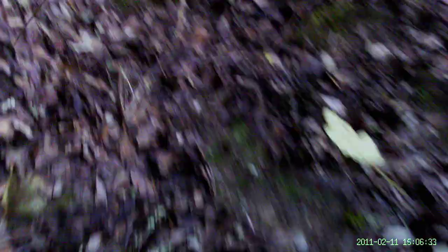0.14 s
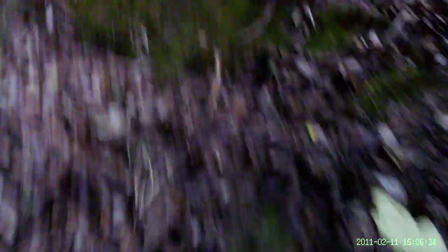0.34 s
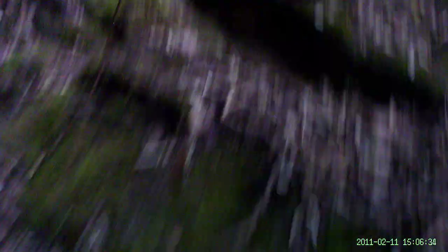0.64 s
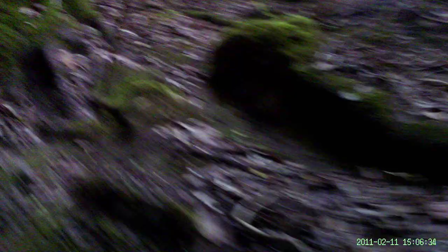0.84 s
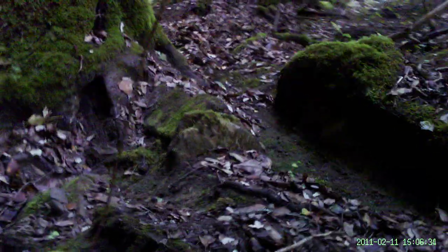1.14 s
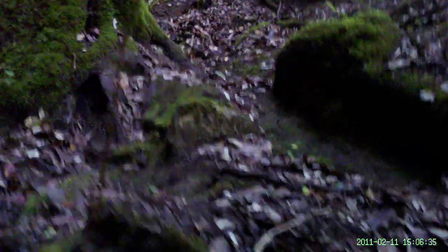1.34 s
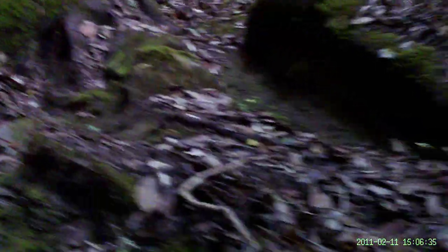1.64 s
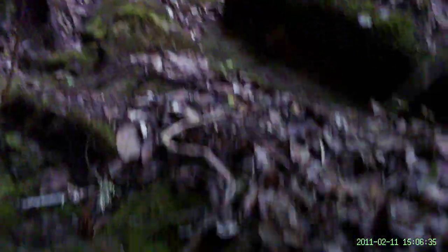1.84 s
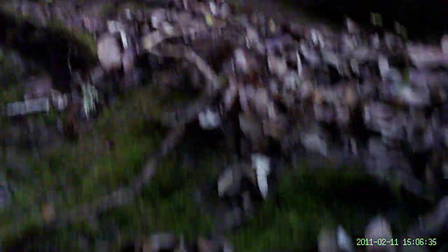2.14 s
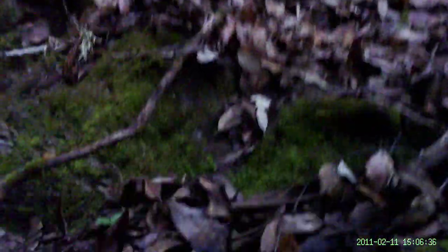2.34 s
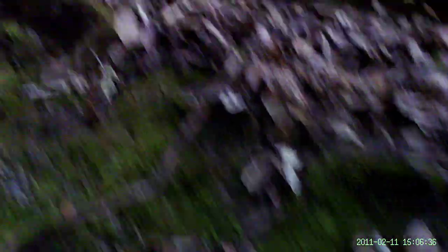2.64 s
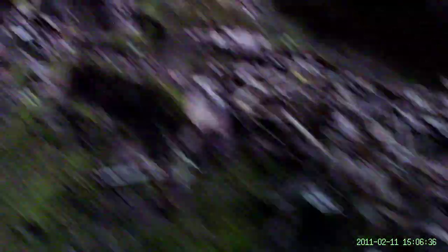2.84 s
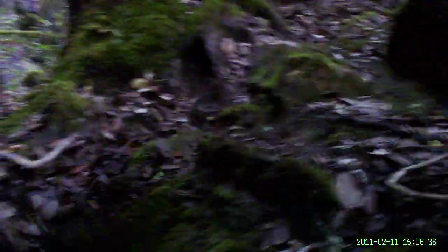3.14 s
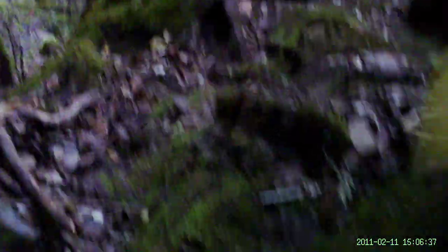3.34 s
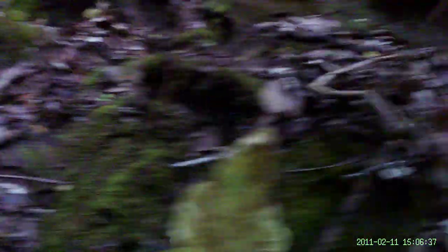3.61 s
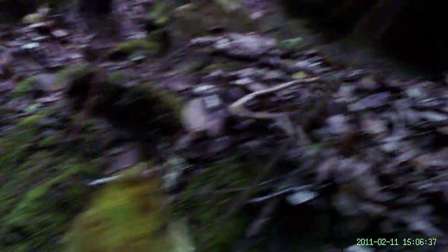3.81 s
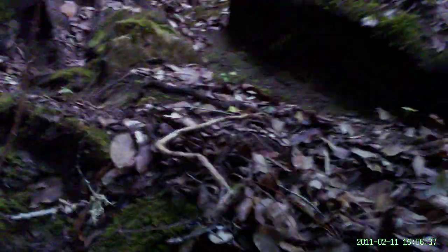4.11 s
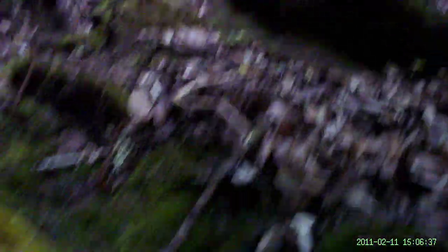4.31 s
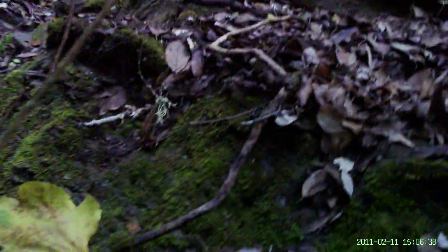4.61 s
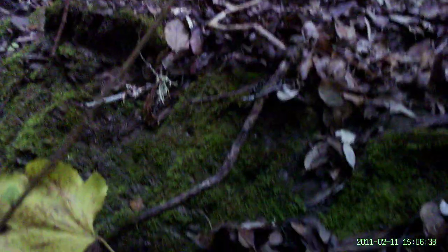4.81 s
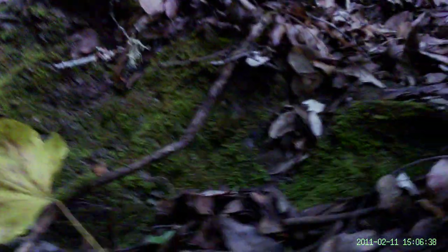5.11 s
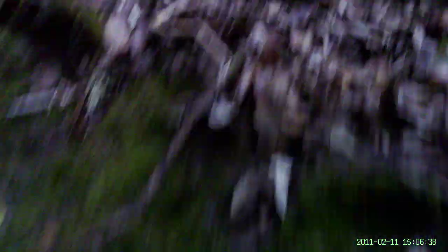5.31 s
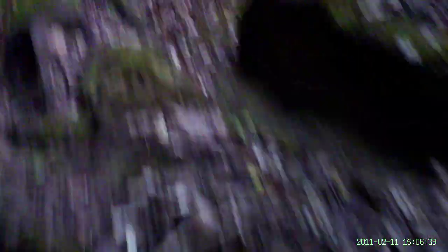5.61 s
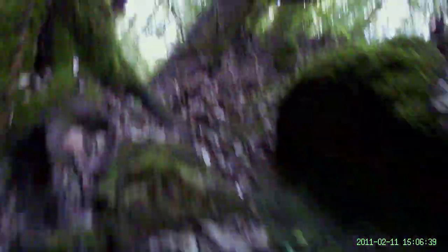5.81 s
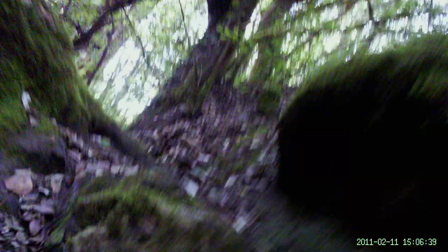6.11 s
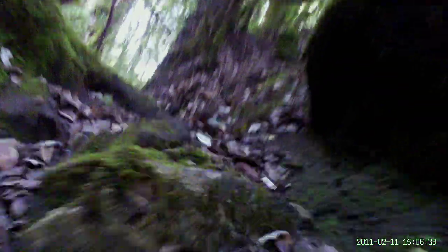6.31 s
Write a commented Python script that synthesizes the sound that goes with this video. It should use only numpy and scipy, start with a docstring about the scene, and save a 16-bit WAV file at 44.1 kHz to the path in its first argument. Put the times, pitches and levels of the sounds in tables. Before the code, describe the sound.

Uneven tinkling of a little metal bell amid crisp leaf litter crackling and twigs snapping, with quiet microphone hiss and a low electrical hum.

```python
"""A small bell jingles irregularly over rustling dry leaves, as someone moves on a forest floor.
Where the clapper lands on the shell decides which modes ring, so each strike has its own colour.
Leaves are clumped fractures that rustle and crunch; sharp bursts snap, and short tones make soft plips.
A lower bell, a bank of dying modes, clinks once. Below lie filtered hiss, an uneven rumble and a low
electronic buzz of steady sines; a peaky microphone colours the clapper and the crisp leaves."""
import sys
import numpy as np
from scipy import signal
from scipy.fft import rfft, irfft
from scipy.io import wavfile

SR = 44100
rng = np.random.default_rng(int(sys.argv[2]) if len(sys.argv) > 2 else 0)


def transcribe(signal):
    """Save signal, clipped to [-1, 1], as a 16-bit WAV file at the path in sys.argv[1]."""
    frames = np.atleast_2d(signal).T
    limited = np.clip(frames, -1, 1)
    pcm = np.round(limited * 32767).astype(np.int16)
    wavfile.write(sys.argv[1], SR, pcm)


N = 284886
TIME = np.arange(N) / SR


def amp(db):
    """Decibels to gain."""
    return 10 ** (np.asarray(db) / 20)


def unit(x):
    """Scales to rms 1."""
    return x / np.sqrt(np.mean(x ** 2) + 1e-20)


def add(mix, start_s, sound):
    """Mixes a sound in at start_s, cutting it at the end of the mix."""
    part = mix[max(round(start_s * SR), 0):][:len(sound)]
    part += sound[:len(part)]


def response(*spectra, size=2048):
    """Causal (minimum-phase) impulse response of energy 1 with the given spectra in series."""
    hz = abs(np.fft.fftfreq(size, 1 / SR))
    db = np.zeros(size)
    for spectrum in spectra:
        point_hz, point_db = np.transpose(spectrum)
        db += np.interp(np.log(hz + 1), np.log(point_hz), point_db)
    log_spectrum = signal.hilbert(np.log(amp(db))).conj()
    taps = np.fft.ifft(np.exp(log_spectrum)).real[:size // 2]
    return taps / np.linalg.norm(taps)


def through(x, taps):
    """Filters by an impulse response."""
    return signal.oaconvolve(x, taps)[:N]


def drift(hz):
    """Smooth chance of rms 1 that changes about hz times a second."""
    lowpass = 1 / (1 + (np.fft.rfftfreq(N, 1 / SR) / hz) ** 4)
    return unit(irfft(rfft(rng.standard_normal(N)) * lowpass, N))


def crackle(per_s, spread_db):
    """Tiny fractures at random moments: many small, a few large; rms 1."""
    sizes = amp(spread_db * np.minimum(rng.exponential(1, N), 4))
    signs = rng.choice([-1, 1], N)
    return unit(sizes * signs * (rng.random(N) < per_s / SR))


# each mode's weak twin: amplitude against the mode, widest split either way [Hz], factor on t60
TWIN, TWIN_SPLIT_HZ, TWIN_LASTS = 0.15, 19.5, 1.7
# the clapper settles on the shell, so a ring dies ever faster:
# its decay is nominal at SETTLE_S and steepens as this power of time
SETTLE_S, SETTLE_POWER = 0.068, 0.16


def ring(modes, t, onset_db=0.5, onset_s=0.0029, rise_s=0.0003, scatter=1.06):
    """Dying modes of a shell not quite round: each has a twin that starts in step, beats and outlasts it."""
    out = np.zeros(len(t))
    settled = t * (t / SETTLE_S) ** SETTLE_POWER
    for hz, db, t60 in modes:
        phase, offset, damping = rng.uniform(-1, 1, 3)
        lasts = max(t60, .01) * scatter ** damping  # the resting clapper damps each mode a little differently
        twin_hz = hz + TWIN_SPLIT_HZ * offset
        twin_level = TWIN * amp(db - 60 * t / (lasts * TWIN_LASTS))
        out += amp(db - 60 * settled / lasts) * np.sin(2 * np.pi * hz * t + np.pi * phase)
        out += twin_level * np.sin(2 * np.pi * twin_hz * t + np.pi * phase)
    onset = amp(onset_db * np.exp(-t / onset_s)) * (1 - np.exp(-t / rise_s))
    return np.sqrt(2) * out / (1 + TWIN / 2) * onset


# how each bell mode above the lowest lies on the shell: (antinode level before strike force [dB],
# lobes along the rim [count], lobes up the wall [count], offset of its first still line [lobes])
MODE_SHAPES = [(-22, 0.25, 0.59, 0.507), (-22, 0.89, -1.36, 0.097), (-18, 1.73, -0.8, 0.098),
               (-29.5, 1.26, -2.5, 0.13), (-23.5, 0.48, -1.08, 0.063), (-31.5, 2, 0.13, 0.8),
               (-31, 1.84, -0.55, 0.67), (-35, 0.73, 1.5, 0.7)]
NODE_LEAK = 0.0071  # power a mode still gets on a still line, before normal motion is added


def struck(force_db, along, up):
    """Level in dB of each upper mode for one strike: strong on its antinodes, weak on its still lines."""
    db, rim_lobes, wall_lobes, offset = np.transpose(MODE_SHAPES)
    motion = np.sin(np.pi * (rim_lobes * along + wall_lobes * up + offset))
    return db + force_db + 10 * np.log10(NODE_LEAK + motion ** 2)


# the bell's modes: (frequency [Hz], nominal t60 [s])
BELL_MODES = [(1741, .22), (3808, .4), (4203, .32), (5473, .2), (6194, .24), (7278, .22), (8330, .18),
              (9195, .15), (10163, .18)]
# faint top modes: (frequency [Hz], level over the three highest main modes [dB], nominal t60 [s])
BELL_TOP_MODES = [(10000, -12, .2), (10560, -7.5, .11), (11560, -14, 0.12), (11500, -20, 0.14),
                  (13655, -22, .13)]
# clapper strikes: (time [s], force [dB], place along the rim [0-1], place up the wall [0-1],
# ring length [factor on t60], nominal level of the lowest mode [dB])
BELL_STRIKES = [(0.0, -20, 0.61, 0.1, 1.7, -59), (0.0855, -17.5, 0.01, 0.17, 0.97, -44.0),
                (0.311, -6.5, 0.8, 0.39, 1.38, -32.5), (0.462, -16, 0.43, 0.93, 1.66, -39.5),
                (0.7, -18, 0.01, 0.12, 0.97, -45), (1.154, -26.5, 0.9, 0.77, 1.1, -44.5),
                (1.4377, -13.5, 0.19, 0.95, 0.78, -44), (1.8169, -2.5, 0.77, 0.43, 1.58, -37.0),
                (1.931, -16, 0.87, 0.4, 1.2, -42.5), (2.477, -19.8, 0.91, 0.77, 0.92, -36.5),
                (2.568, -4, 0.82, 0.54, 0.92, -41), (2.813, -18.5, 0.37, 0.33, 1.25, -50.5),
                (2.9886, -11.5, 0.58, 0.25, 0.99, -42.5), (3.209, -17, 0.99, 0.14, 0.8, -56.5),
                (3.3206, -5, 0.68, 0.5, 0.82, -36), (3.689, -11, 0, 0.66, 0.87, -36.0),
                (3.7793, -12.2, 0.8, 0.52, 1.34, -61), (3.897, -8.5, 0.45, 0.77, 0.81, -37),
                (3.999, -21, 1, 0.01, 1.05, -43), (4.2204, -23, 0.1, 0, 0.78, -42),
                (4.327, 0.0, 0.61, 0.39, 0.67, -43.5), (4.3694, -16, 0.09, 0, 0.99, -43.5),
                (5.0951, -14, 0.3, 0.38, 0.79, -35), (5.6164, -20, 0.09, 0.13, 0.94, -44.5),
                (5.8036, -22, 0, 0.3, 0.46, -36.5), (5.9723, -5.5, 0.21, 0.95, 0.78, -45),
                (6.1614, -16.5, 0.76, 0.84, 1.1, -43.5), (6.294, -5.5, 0.3, 0.89, 0.41, -45.5)]
# brief clank just under the lowest mode: (frequency [Hz], level over that mode [dB], nominal t60 [s])
SHELL_CLANK = (1637, -6, 0.028)
# clapper contact: (frequency [Hz], relative level [dB per Hz])
CLAPPER_SPECTRUM = [(500, -41), (2800, -21), (3900, -4), (6000, -1), (9000, -2), (12000, -1.5),
                    (16000, -20)]
# the microphone's peaky colour: (frequency [Hz], gain [dB])
MIC_COLOUR = [(100, 4.5), (2600, 0), (3400, 2), (4100, 8.5), (4750, 15.5), (5300, 8), (6000, 0.5),
              (7500, -1.5), (16000, -0.5)]
# whatever presses on the shell shortens the ring and pulls it flat, steeply so when it presses hard
FREE_CENTS, PRESSED_CENTS, PRESS_POWER = 5.75, 5.45, 2.65
LOW_MODE_FOLLOWS = 0.24  # power of the ring length felt by the lowest mode; the others feel it fully


def bell(tick_db=-4.5, tick_t60=0.013, chatter_db=-19, chatter_t60=0.36, sag_s=0.112, stop_s=0.017):
    """Each strike rings the modes with a tick and some chatter; the clapper's next touch stops the old ring."""
    rings, contact = np.zeros(N), np.zeros(N)
    next_times = [row[0] for row in BELL_STRIKES[1:]] + [N / SR]
    for (s, force_db, along, up, length, low_db), next_s in zip(BELL_STRIKES, next_times):
        t = np.arange(0, min(next_s - s + .03, .5), 1 / SR)
        levels = [low_db, *struck(force_db, along, up)]
        modes = [(hz, db, t60 * length) for (hz, t60), db in zip(BELL_MODES, levels)]
        low_hz, low_t60 = BELL_MODES[0]
        modes[0] = (low_hz, low_db, low_t60 * length ** LOW_MODE_FOLLOWS)
        treble_db = 10 * np.log10(np.mean(amp(levels[-3:]) ** 2))
        for hz, db, t60 in BELL_TOP_MODES:
            modes.append((hz, treble_db + db + rng.uniform(-4, 4), t60 * length))
        clank_hz, clank_db, clank_t60 = SHELL_CLANK
        modes.append((clank_hz, low_db + clank_db, clank_t60))
        # the detuning grows as the ring dies
        cents = FREE_CENTS - PRESSED_CENTS / length ** PRESS_POWER
        pitch = 2 ** (cents * (.5 + t / sag_s) / 1200)
        stopped = np.exp(-np.maximum(s + t - next_s, 0) / stop_s)
        add(rings, s, ring(modes, t * pitch) * stopped)
        force = np.linalg.norm(amp(levels))
        tick = amp(tick_db - 60 * t / tick_t60)
        chatter = amp(chatter_db - 60 * t / chatter_t60)
        add(contact, s, force * (tick + chatter))
    grains = contact * crackle(14000, spread_db=5.0)
    return rings + through(grains, response(CLAPPER_SPECTRUM, MIC_COLOUR))


def chips(low_hz, high_hz, per_s, cycles, spread_db, size=500):
    """Fractures in scraps of many sizes: each rings for a few cycles at its own pitch; rms 1."""
    when, height, chance, sign = rng.random((int(per_s * N / SR), 4)).T[:, :, None]
    turns = low_hz * (high_hz / low_hz) ** height * np.arange(size) / SR
    scraps = np.sin(2 * np.pi * turns) * turns * np.exp(-turns / cycles) * np.linspace(1, 0, size)
    scraps /= np.linalg.norm(scraps, axis=1, keepdims=True)
    # many small, a few large
    scraps *= np.sign(sign - .5) * amp(spread_db * np.minimum(-np.log(chance), 4))
    places = (when * N).astype(int) + np.arange(size)
    return unit(np.bincount(places.ravel(), scraps.ravel(), N)[:N])


# steady rustle: (time [s], crisp top level before trim [dB], hollow litter level before trim [dB])
RUSTLE = [(0.0, -52.5, -60.5), (0.34, -46.5, -57), (0.61, -48.5, -59.5), (0.81, -46.5, -58.5),
          (1.44, -48.5, -61), (1.6, -50, -63), (2.12, -50, -59), (2.81, -54, -62.5), (3.18, -53.5, -62),
          (3.42, -54, -63), (3.65, -52.5, -60), (4.23, -49.5, -62), (4.84, -51.5, -61), (4.98, -53.5, -61),
          (5.14, -51.5, -63.5), (6.01, -48, -57.5), (6.13, -46.5, -56.5), (6.46, -43.5, -54)]
# slow sweeps through the leaves, and short crunches under a foot:
# (middle time [s], half width [s], level [dB], hollow body over that level before trim [dB])
FOOT_CRUNCHES = [(.215, 0.027, -37.5, -6), (.69, 0.077, -42, -19), (.829, 0.016, -35.5, -2),
                 (1.257, 0.0099, -38, -7), (1.35, .021, -27, -7), (1.512, 0.0057, -38.5, -10),
                 (2.205, 0.011, -42.5, 0), (3.04, 0.057, -41.5, -8), (3.149, 0.0073, -36, -24),
                 (3.365, 0.0061, -32.5, -11), (3.679, 0.02, -50, 11.5), (4.527, 0.0062, -41, -9),
                 (4.629, .0055, -37.5, -19), (4.951, 0.0064, -39, 9), (4.993, 0.0041, -39.5, 9.5),
                 (5.036, 0.009, -35, 4.5), (5.48, 0.064, -39.5, -35), (5.713, 0.016, -32.5, -10.5),
                 (6.22, 0.018, -37, -2), (6.405, 0.0027, -33.5, -7)]
# dry leaves: (frequency [Hz], relative level [dB per Hz])
LEAF_SPECTRUM = [(300, -14), (1000, -18.5), (2500, -5.5), (4000, -1.5), (6000, -1), (8000, -4.5),
                 (9800, -6.5), (11500, -13.5), (14000, -15), (16000, -24)]
# hollow body of the litter: (frequency [Hz], relative level [dB per Hz])
BODY_SPECTRUM = [(200, -3.5), (550, -6), (850, -2), (1300, -4), (2000, -6), (3200, -3.5), (5000, 3),
                 (12000, -76)]
# leaves sliding: (frequency [Hz], relative level [dB per Hz])
SWISH_SPECTRUM = [(500, -19), (2500, -8), (4500, -2), (6500, 2), (9800, -4.5), (12000, -14), (16000, -12)]


def leaves(stir_db=-0.5, chip_db=-5, stir_body_db=-2.0, clump_db=2.0, thud_db=-4, smooth_s=0.039):
    """Clumped fractures: a light rustle all along, and denser bursts where weight comes down."""
    s, crisp_db, hollow_db = np.transpose(RUSTLE)
    crisp = amp(np.interp(TIME, s, crisp_db) + stir_db + clump_db * drift(22))
    hollow = amp(np.interp(TIME, s, hollow_db) + stir_body_db + clump_db * drift(12.7))
    crush, slide, thud = np.zeros((3, N))
    for s, width, db, body_db in FOOT_CRUNCHES:
        weight = amp(db) * np.exp(-((TIME - s) / width) ** 2 / 2)
        breaking = 1 / (1 + (width / smooth_s) ** 2)  # a quick press breaks leaves, a slow sweep mostly slides them
        crush += weight * breaking
        slide += weight * (1 - breaking)
        thud += weight * amp(body_db + thud_db)
    scraps = amp(chip_db) * chips(2570, 11000, per_s=700, cycles=3.4, spread_db=3.0)
    dry_leaves = crisp * (crackle(8000, spread_db=0) + scraps)
    dry_leaves += crush * crackle(7000, spread_db=4.5)
    swish = through(slide * rng.standard_normal(N), response(SWISH_SPECTRUM, MIC_COLOUR))
    deep = hollow * chips(427, 2390, per_s=600, cycles=1.73, spread_db=3.0)
    deep += thud * crackle(2500, spread_db=1.5)
    top = through(dry_leaves, response(LEAF_SPECTRUM, MIC_COLOUR))
    return top + through(deep, response(BODY_SPECTRUM)) + swish


# still forest air with hiss: (frequency [Hz], relative level [dB per Hz])
AIR_SPECTRUM = [(20, -9.5), (60, 18), (130, 13.5), (250, 11), (400, 6), (700, -7), (1500, -6), (2500, -4),
                (5000, -8), (9000, -7.5), (16000, -10.5)]


def air(hiss_db=-52, rumble_db=-60, waver_db=3):
    """Still forest air and microphone hiss as filtered noise, over a faint uneven rumble."""
    hiss = amp(hiss_db) * through(rng.standard_normal(N), response(AIR_SPECTRUM, size=8192))
    band = signal.butter(2, [80, 230], "band", fs=SR, output="sos")
    low = signal.sosfilt(band, rng.standard_normal(N))
    return hiss + amp(rumble_db) * unit(low * amp(waver_db * drift(45)))


# electronic buzz, two interleaved series of lines: (frequency [Hz], rms level [dB])
BUZZ_LINES = [(25, -62), (38.28, -48), (50, -57), (51.56, -63), (63.28, -64), (64.84, -61), (76.56, -56),
              (88.28, -56), (101.56, -66), (113.28, -58), (114.84, -58), (138.28, -61), (153.12, -63),
              (163.28, -67), (191.4, -68), (229.68, -66)]


def buzz():
    """Low steady lines that start in step, so they bunch into soft, uneven pulses."""
    return sum(np.sqrt(2) * amp(db) * np.cos(2 * np.pi * hz * TIME) for hz, db in BUZZ_LINES)


def forest(x, wet_db=-17, t60=0.35):
    """Trunks and ground scatter a faint tail: sparse random echoes that die away."""
    t = np.arange(SR) / SR
    echoes = rng.standard_normal(SR) * (rng.random(SR) < 2000 / SR)
    taps = echoes * amp(-60 * t / t60) * (t > .006)
    return x + amp(wet_db) * through(x, taps / np.linalg.norm(taps))


# lesser snaps come by chance: how many a second, level over the rustle's crisp column, body under that
STRAY_PER_S, STRAY_OVER_DB, STRAY_BODY_DB = 2.3, 17, -22


def stray_snaps(spread_db=3):
    """Rows like those of CLEAR_SNAPS at random moments, louder where the leaves are stirred more."""
    when, size = rng.random((int(STRAY_PER_S * N / SR), 2)).T
    s = when * N / SR
    stir_s, stir_db, _ = np.transpose(RUSTLE)
    db = np.interp(s, stir_s, stir_db) + STRAY_OVER_DB + spread_db * (2 * size - 1)
    return list(zip(s, db, db + STRAY_BODY_DB))


# the clearest leaves and twigs that snap:
# (time [s], crisp peak before splinters and dulling [dB], low body before trim [dB])
CLEAR_SNAPS = [(.1991, -23, -53), (.2937, -24, -49), (.6953, -27, -49), (.7682, -24, -49), (.791, -19, -52),
               (.8361, -19.5, -43), (1.2516, -26, -50), (1.2627, -19, -52), (1.503, -23, -53),
               (1.5457, -16.5, -38), (1.5626, -20, -43), (2.0093, -26.5, -52), (3.094, -22, -54),
               (3.2294, -19, -30.5), (3.3573, -14.5, -33), (3.459, -23, -35), (3.58, -29.5, -24.5),
               (4.4277, -22.5, -51), (4.5244, -20, -50), (4.9222, -24, -46), (4.9503, -20, -53),
               (4.9837, -23, -46), (5.6905, -19, -23.5), (6.2299, -18, -34), (6.3989, -22, -41)]


def snaps(body_trim_db=2, splinter=0.048, splinter_t60=0.045, top_hz=9500, delay_s=0.000973):
    """A sharp break and its dying splinters, sounded through the crisp leaf and the hollow litter."""
    out, t = np.zeros(N), np.arange(SR // 20) / SR
    crisp, body = response(LEAF_SPECTRUM, MIC_COLOUR), response(BODY_SPECTRUM)
    for s, crisp_db, body_db in list(CLEAR_SNAPS) + stray_snaps():
        splinters = splinter * rng.standard_normal(len(t)) * amp(-60 * t / splinter_t60)
        burst = signal.unit_impulse(len(t)) + splinters
        for taps, db in ((crisp, crisp_db), (body, body_db + body_trim_db)):
            add(out, s + delay_s, amp(db) * signal.fftconvolve(burst, taps / abs(taps).max()))
    # the litter dulls the very top
    return signal.sosfilt(signal.butter(4, top_hz, fs=SR, output="sos"), out)


# soft plips and knocks: (time [s], starting frequency [Hz], nominal level [dB], t60 [s])
SOFT_PLIPS = [(.254, 330, -35, 0.024), (.912, 9200, -34.5, 0.019), (.943, 1086, -48.5, .071),
              (1.40, 1795, -36, 0.056), (1.995, 570, -36, .02), (2.608, 893, -43, 0.066),
              (3.072, 330, -34.5, 0.023), (3.228, 2000, -25.5, 0.0097), (3.578, 868, -41.5, 0.057),
              (5.959, 1380, -30, .015), (6.229, 750, -25, .012), (6.27, 1970, -39.5, .042)]


def plips(rise_s=0.002, glide=0.34):
    """Short soft-edged tones that bend slightly upward."""
    out, t = np.zeros(N), np.arange(SR // 8) / SR
    for s, hz, db, t60 in SOFT_PLIPS:
        envelope = 2 * amp(db - 60 * t / t60) * (1 - np.exp(-t / rise_s))
        add(out, s, envelope * np.sin(2 * np.pi * hz * t * (1 + glide * t)))
    return out


# the lower bell's modes: (frequency [Hz], level relative to the strike [dB], nominal t60 [s])
LOW_BELL_MODES = [(1570, -13, 0.16), (3380, -4.5, 0.1), (3640, -9.5, .13), (4650, -13, 0.097),
                  (5320, 2.5, 0.097), (6000, -17, 0.25), (8100, -6, 0.088), (9970, -8, 0.055)]
# its one strike: (time [s], level [dB])
LOW_BELL_STRIKE = (4.8015, -36)


def low_bell():
    """One dull clink of quickly dying modes."""
    out = np.zeros(N)
    s, db = LOW_BELL_STRIKE
    add(out, s, amp(db) * ring(LOW_BELL_MODES, np.arange(SR // 3) / SR))
    return out


def scene():
    """Everything reaches one microphone, heard alike in both channels."""
    sources = bell() + low_bell() + leaves() + snaps() + plips()
    mono = forest(sources) + air() + buzz()
    return np.array([mono, mono])


EDGE_HZ = 15950


def record(dry):
    """The band limit: a steep low-pass at EDGE_HZ."""
    lowpass = signal.firwin(511, EDGE_HZ, window=("kaiser", 9), fs=SR)
    return signal.oaconvolve(dry, lowpass[None], "same")


dry = scene()
out = record(dry)
transcribe(out)
```